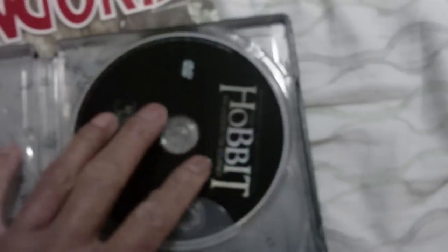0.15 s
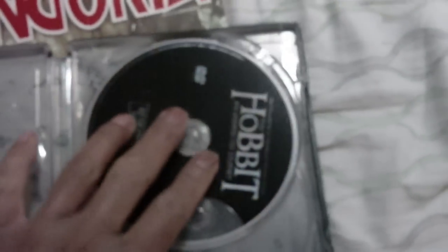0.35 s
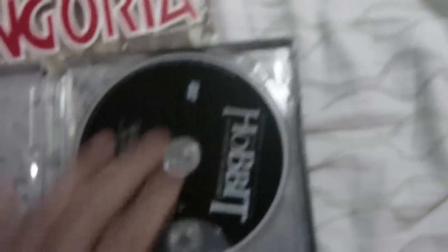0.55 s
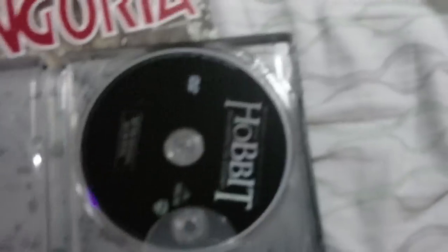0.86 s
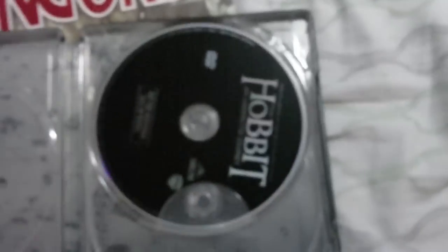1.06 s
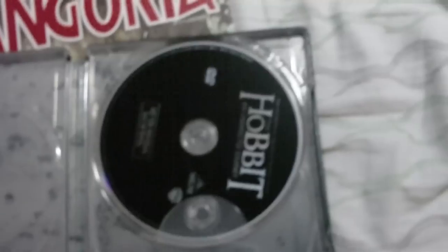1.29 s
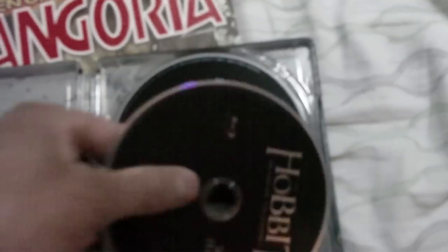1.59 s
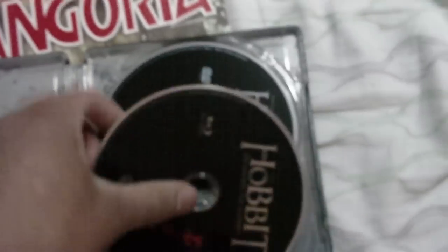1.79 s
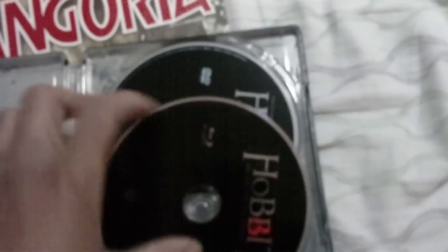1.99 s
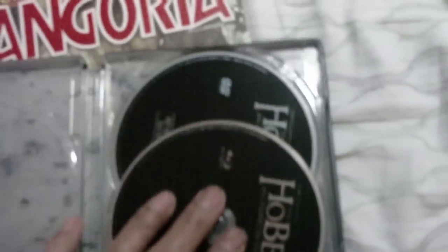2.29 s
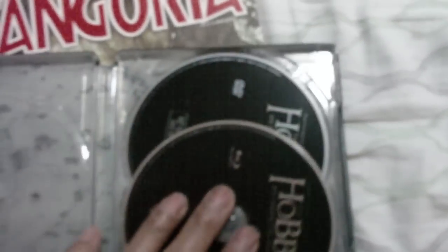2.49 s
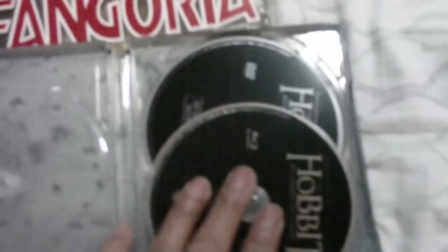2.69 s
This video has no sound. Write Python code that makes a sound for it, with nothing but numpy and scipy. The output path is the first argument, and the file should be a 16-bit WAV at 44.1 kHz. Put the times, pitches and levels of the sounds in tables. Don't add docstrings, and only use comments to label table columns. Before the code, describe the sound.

Two discs are pushed into a thin plastic case on a bed: one sharp crack early, light handling taps and rubs, then a longer clattering run of clacks, heard close and dry with soft hiss and faint lens ticks.

```python
import sys
import numpy as np
from scipy import signal
from scipy.fft import rfft, irfft, next_fast_len
from scipy.io import wavfile
from scipy.ndimage import uniform_filter1d, map_coordinates

SR = 44100
rng = np.random.default_rng(int(sys.argv[2]) if len(sys.argv) > 2 else 0)


def gain_from_db(level_db):
    decades = np.asarray(level_db, float) / 20
    return 10 ** decades


def store_wav(level_fs):
    pcm = np.round(np.clip(np.atleast_2d(level_fs), -1, 1) * 32767)
    wavfile.write(sys.argv[1], SR, pcm.T.astype(np.int16))


N = 125685

# (frequency [Hz], level [dB])
PORT = [(7000, -40), (10500, -16), (12500, -5), (15000, 0), (16200, -3), (17300, -22)]


def unit(x):
    return x / np.sqrt(np.mean(x ** 2) + 1e-20)


def top(x, db):
    return gain_from_db(db) * x / np.abs(x).max()


def along(points, hz):
    f, v = np.transpose(points)
    return np.interp(np.log(hz + 1), np.log(f + 1), v)


def bump_db(hz, centre_hz, octaves):
    return -6 * (np.log2((hz + 1) / centre_hz) / octaves) ** 2


def wobble(rate_hz):
    knots = rng.standard_normal(int(N * rate_hz / SR) + 4)
    return map_coordinates(knots, [np.arange(N) * rate_hz / SR])


def filtered(x, response):
    m = next_fast_len(x.shape[-1] + 8192)
    spectrum = rfft(x, m) * response(np.fft.rfftfreq(m, 1 / SR))
    return irfft(spectrum, m)[..., :x.shape[-1]]


def noise(points, size=N):
    return unit(filtered(rng.standard_normal(size), lambda hz: gain_from_db(along(points, hz))))


def add(track, s, piece):
    part = track[round(s * SR):][:len(piece)]
    part += piece[:len(part)]


def add_in_room(track, s, piece):
    add(track, s, piece)
    add(track, s, echo(piece))


def plastic_blows(out, t):
    # (time [s], knock level [dB], clack level [dB], clack centre [Hz], snap level [dB])
    blows = [(0.074, -52, -60, 1400, -46), (0.106, -39, -26, 3670, -15.5), (0.1612, -37, -31, 1360, -19.5),
             (0.1692, -34, -24.5, 1530, -39), (0.2021, -24, -16, 3400, -9), (0.203, -40, -26, 4500, -11),
             (0.205, -24, -21, 2600, -10), (0.2064, -23, -19, 4200, -20), (0.2082, -26.5, -30, 1460, -40),
             (0.215, -62, -43, 1630, -44), (0.222, -55, -39, 1400, -46), (0.7512, -41, -55, 1790, -56),
             (0.7629, -40, -47, 1310, -48), (1.2091, -40, -46, 1310, -40),
             (1.2426, -37.5, -40, 2500, -39.5), (1.251, -44, -55, 1310, -49),
             (1.516, -41.5, -52, 1310, -57), (1.5618, -49, -30, 1890, -25.5),
             (1.566, -33, -26.5, 1360, -45), (1.648, -37, -40, 1310, -36.5), (1.653, -36.5, -42, 1310, -49),
             (1.7616, -31, -37.5, 2310, -59), (1.769, -36, -31, 1470, -56), (1.784, -53.5, -42, 2500, -44),
             (1.801, -63, -29, 1340, -26.5), (1.803, -33, -31.5, 2330, -40), (1.8062, -31, -26, 2170, -51),
              (1.828, -37, -34, 1580, -28), (2.038, -37.5, -35.5, 2600, -34.5),
              (2.1076, -38.5, -40, 1310, -40), (2.1227, -33.5, -42, 4500, -37),
              (2.137, -21.5, -12, 2820, -18), (2.1453, -33, -31, 2390, -50),
              (2.1582, -25.5, -17, 2600, -32), (2.1637, -29.5, -27, 1530, -13),
              (2.1614, -40, -36, 3000, -31), (2.1677, -45, -22.5, 1590, -38), (2.168, -37, -32, 3000, -28),
              (2.1726, -38, -27, 2410, -33), (2.174, -23.5, -31, 3000, -25),
              (2.1758, -45, -19.5, 3020, -46), (2.1923, -26.5, -20, 2600, -23.5),
              (2.2127, -52, -31, 2880, -45), (2.229, -53, -36, 2500, -55), (2.4206, -36, -28, 3000, -28),
              (2.421, -19.5, -18, 1690, -11.5), (2.4328, -24, -19.5, 3000, -16.5),
              (2.4393, -27.5, -18, 2570, -28), (2.4792, -36, -30, 2200, -32),
              (2.563, -19, -20, 1500, -17.5), (2.5656, -26.5, -22.5, 3550, -13),
              (2.575, -36, -33, 2800, -45)]
    # (frequency [Hz], level [dB])
    tray = [(560, -8), (680, -3), (830, -1), (980, -1), (1110, 0)]
    # (frequency [Hz], level [dB])
    hub = [(1400, 0.0063), (1500, 0.0077), (1650, 0.011), (2060, 0.006), (2200, 0), (2380, 0),
           (2530, 0.025), (2750, 0.0079), (3100, 0), (3600, 0.01), (4100, 0.02), (4350, 0.01), (4800, 0)]
    # (frequency [Hz], level [dB])
    crack_colour = [(3000, -20), (4500, 10), (6500, 4.5), (8500, 1), (10500, -28), (12000, -27)]
    tray_t60_s, hub_t60_s = 0.019, 0.021
    contact_s, contact_growth = .00042, .025
    crack_under_db, bass_cut_hz = 9.5, 260
    for s, knock_db, clack_db, centre_hz, snap_db in blows:
        u = t / (contact_s * gain_from_db(contact_growth * 10 * (snap_db + 24)))
        touch = u * np.exp(-u)
        knock = top(ring(tray, tray_t60_s, t), knock_db)
        clack = top(ring(hub, hub_t60_s, t, centre_hz), clack_db)
        crack_db = (clack_db + snap_db) / 2 - crack_under_db
        crack = top(touch * noise(crack_colour, len(t)), crack_db)
        snap = top(touch * noise(PORT, len(t)), snap_db)
        hit = filtered(knock + clack + crack + snap,
                       lambda hz: (1j * hz / (bass_cut_hz + 1j * hz)) ** 2)
        add_in_room(out, s, hit)


def ring(modes, t60_s, t, centre_hz=0):
    rise_s, ring_octaves = .0002, 0.6
    scatter_db, detune, phase_scatter_rad = 2.5, .02, .5
    t60_at_hz, damping_slope = 1500, 0.73
    hz, level_db = np.transpose(modes)[:, :, None]
    luck = rng.standard_normal((3, len(modes), 1))
    level_db = level_db + scatter_db * luck[0]
    if centre_hz:
        level_db = level_db + np.maximum(bump_db(hz, centre_hz, ring_octaves), -16)
    decay = gain_from_db(level_db - 60 * t / t60_s * (hz / t60_at_hz) ** damping_slope)
    phase = 2 * np.pi * hz * (1 + detune * luck[1]) * t + phase_scatter_rad * luck[2]
    return (decay * np.sin(phase)).sum(axis=0) * (1 - np.exp(-(t / rise_s) ** 2))


def single_modes(out, t):
    # (time [s], level [dB], frequency [Hz], t60 [s])
    thuds = [(.1059, -28, 2780, .02), (.1065, -38, 850, .03), (.134, -50, 900, .02),
             (.1612, -35, 5300, .01), (.1614, -38, 2920, .012), (.1696, -31, 2650, .015),
             (.2065, -22, 6300, .008), (.2075, -33, 1500, .05), (.215, -36, 1620, .03),
             (.7625, -46, 349, .018), (.764, -47, 650, .02), (1.2437, -39, 2380, .014),
             (1.249, -48, 375, .02), (1.25, -52, 4500, .012), (1.333, -52, 4300, .015),
             (1.514, -50, 487, .02), (1.564, -44.5, 350, .02), (1.562, -28, 1130, .03),
             (1.5622, -30, 900, .03), (1.5625, -28, 2030, .025), (1.563, -38, 3800, .012),
             (1.65, -46, 3800, .012), (1.7615, -39, 4100, .012), (1.829, -39, 1600, .03),
             (1.829, -42, 2500, .025), (1.801, -31.5, 1003, .02), (1.802, -32, 2530, .025),
             (2.0392, -37, 2450, .016), (2.1215, -36, 2480, .06), (2.137, -30, 7100, .008),
             (2.139, -27, 1520, .04), (2.159, -35, 7100, .008), (2.166, -30, 2500, .04),
             (2.177, -27.5, 677, .02), (2.193, -34, 7100, .008), (2.194, -34, 1660, .035),
             (2.4213, -18, 2546, .018), (2.4215, -25, 4010, .012), (2.4215, -27, 5350, .01),
             (2.433, -23, 2600, .02), (2.435, -28, 1100, .018), (2.4395, -32, 5600, .009),
             (2.4405, -27, 1230, .022), (2.5631, -19, 2200, .018), (2.5633, -22, 4330, .018),
             (2.5655, -25, 3900, .012), (2.566, -26, 990, .04), (2.57, -33, 1650, .06),
             (2.588, -40, 1650, .03), (2.638, -48, 594, .015)]
    partner_db, partner_offset = -10, .06
    for s, db, hz, t60_s in thuds:
        luck = rng.uniform(-1.03, 1, size=2)
        partner_hz = hz * (1 + partner_offset * (luck[0] + np.sign(luck[0])) / 2)
        partner = gain_from_db(partner_db) * np.sin(2 * np.pi * partner_hz * t + luck[1])
        pair = np.sin(2 * np.pi * hz * t) + partner
        add_in_room(out, s, top(pair * gain_from_db(-60 * t / t60_s) * (1 - np.exp(-t * hz)), db))


def hub_grip(out, t):
    start_s, length_s, level_db = .2047, .0033, -2.5
    swell = np.sin(np.pi * np.clip(t / length_s, 0, 1)) ** 2
    add_in_room(out, start_s, top(swell * noise(PORT, len(t)), level_db))


def bed_thumps(out, t):
    # (time [s], level [dB])
    thumps = [
        (0.2053, -23),
        (2.566, -37.5),
    ]
    u = t / .0007
    for s, db in thumps:
        add(out, s, top(-u * (1 - 0.34 * u) * np.exp(-u), db))


def echo(x):
    # (frequency [Hz], t60 [s])
    decay = [(200, 0.25), (1500, 0.23), (5000, 0.15), (14000, 0.11)]
    # (frequency [Hz], level [dB])
    colour = [(200, 1.5), (800, -2), (1600, -1), (3000, -5), (6000, -7), (10000, -7), (14000, -4.5)]
    room_db, build_s = -21, 0.0014
    hz, t, z = signal.stft(rng.standard_normal(SR // 4), SR, nperseg=128)
    fade_db = along(colour, hz)[:, None] - 60 * t / along(decay, hz)[:, None]
    tail = signal.istft(z * gain_from_db(fade_db), SR, nperseg=128)[1]
    tail = tail * (1 - np.exp(-np.arange(len(tail)) / SR / build_s))
    tail = tail / np.sqrt(SR * 0.003) / np.abs(tail).max() * 2
    return gain_from_db(room_db) * signal.fftconvolve(x, tail)


def contacts():
    out, t = np.zeros(N), np.arange(SR // 12) / SR
    plastic_blows(out, t)
    single_modes(out, t)
    hub_grip(out, t)
    bed_thumps(out, t)
    return out


def rubbing():
    # (time [s], length [s], level [dB], centre [Hz])
    rubs = [
        (0.445, 0.047, -58, 1230),
        (1.188, 0.049, -54.5, 785),
        (1.562, 0.03, -46.5, 1500),
        (1.687, 0.057, -57, 1286),
        (1.812, 0.053, -53, 1500),
        (2.106, 0.034, -48, 2040),
        (2.153, 0.052, -53, 2370),
        (2.193, 0.046, -52, 1700),
    ]
    octaves, lumps_db = 0.88, 1.8
    out, t = np.zeros(N), np.arange(SR // 4) / SR
    lumps = gain_from_db(lumps_db * wobble(250))
    for s, length_s, db, centre_hz in rubs:
        grit = unit(filtered(rng.standard_normal(len(t)),
                             lambda hz: gain_from_db(bump_db(hz, centre_hz, octaves))))
        swell = np.sqrt(np.sin(np.pi * np.clip(t / length_s, 0, 1)) ** 2 + 1e-12) ** .5
        add(out, s, gain_from_db(db) * grit * swell)
    return out * lumps


def focus():
    # (first step [s], steps [count], level [dB])
    runs = [(.0753, 2, 0), (.2702, 1, -2), (.2786, 1, -2), (.2823, 1, -3), (.292, 1, 0), (.577, 3, 0),
            (.7711, 1, -3), (.7801, 2, 0), (.9714, 4, -1), (1.2752, 1, 0), (1.2874, 2, 0), (1.5795, 2, 0),
            (1.6763, 3, 0), (1.8764, 3, 0), (2.0722, 1, -3), (2.0811, 1, -1), (2.0926, 1, 0),
            (2.4731, 4, -1), (2.5751, 1, 2), (2.5827, 22, 0), (2.7166, 21, 0)]
    # (time [s], level [dB])
    step_ticks = [(-.0018, -7), (-.0007, -5), (-.0002, 0), (.0006, -1), (.0021, -4), (.0036, -12)]
    # (frequency [Hz], level [dB])
    barrel = [(4000, -34), (11300, -24), (12600, -12), (13700, -1), (15000, 0), (15800, -7), (16300, -40)]
    step_s, jitter_s = .00599, .00003
    step_db, scatter_db, whirr_db = -35.5, 1.5, -21
    steps = np.array([(s + step_s * k, db) for s, count, db in runs for k in range(count)])
    at_s, size_db = np.transpose(step_ticks)
    luck = rng.standard_normal((2, len(steps), len(step_ticks)))
    where = np.round((steps[:, :1] + at_s + jitter_s * luck[0]) * SR).astype(int).ravel()
    size = gain_from_db(steps[:, 1:] + size_db + scatter_db * luck[1]).ravel()
    ticks = np.bincount(where, size, N)[:N]
    moving = np.clip(uniform_filter1d(ticks, size=260) * 90, 0, 1)
    whirr = gain_from_db(whirr_db) * moving * rng.standard_normal(N)
    return top(filtered(ticks + whirr, lambda hz: gain_from_db(along(barrel, hz))), step_db)


def screen_whistles():
    # (frequency [Hz], rms level [dB])
    whistles = [
        (15709.2, -65),
        (11090, -80),
    ]
    t, out = np.arange(N) / SR, np.zeros(N)
    for hz, db in whistles:
        level = np.sqrt(2) * gain_from_db(db + .7 * wobble(30))
        out += level * np.sin(2 * np.pi * hz * t + .08 * wobble(20))
    return out


def room():
    # (frequency [Hz], density [dB per Hz])
    hiss_colour = [(40, -39), (70, -19.5), (295, -7), (1100, -7), (4000, -16.5), (8800, -27),
                   (12500, -23.5), (15700, -8.5)]
    # (time [s], level [dB])
    hiss_level = [(0.0, -59.5), (2.14, -58), (2.85, -56)]
    # (frequency [Hz], level [dB])
    rumble_colour = [(5, -2), (20, -5), (60, -17.5), (120, -22), (200, -64)]
    rumble_db, rumble_lumps_db = -69, 3.5
    hiss_db = np.interp(np.arange(N) / SR, *np.transpose(hiss_level)) + wobble(8)
    hiss = gain_from_db(hiss_db) * noise(hiss_colour + [(16000, -60)])
    rumble = gain_from_db(rumble_db + rumble_lumps_db * wobble(8.7)) * noise(rumble_colour)
    return hiss + rumble


def scene():
    return (contacts() + rubbing() + focus() + screen_whistles() + room())[None]


def roll_off(x):
    return signal.sosfilt(signal.butter(12, 17510, fs=SR, output="sos"), x)


def record(dry):
    top_hz, slope_db_per_hz = 15800, .02
    mix = filtered(dry, lambda hz: gain_from_db(-slope_db_per_hz * np.maximum(hz - top_hz, 0)))
    return roll_off(mix)


dry = scene()
out = record(dry)
store_wav(out)
```